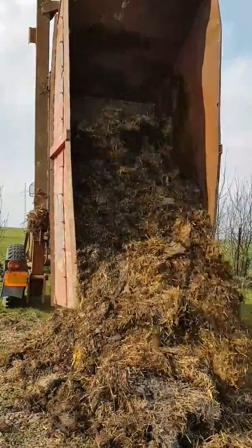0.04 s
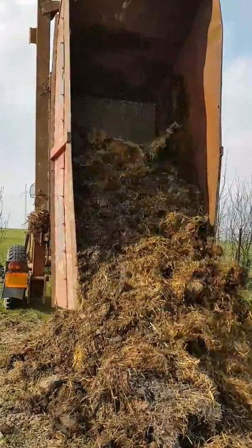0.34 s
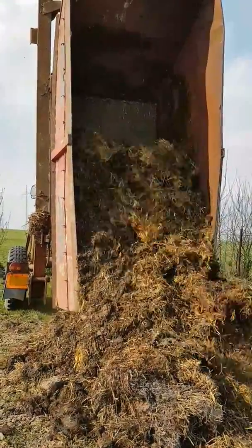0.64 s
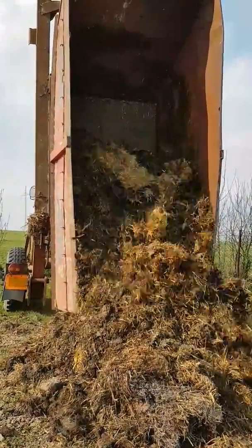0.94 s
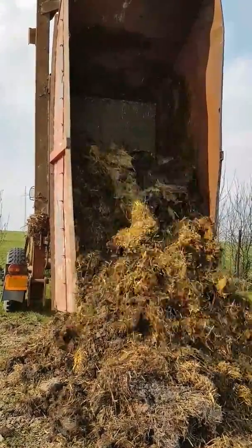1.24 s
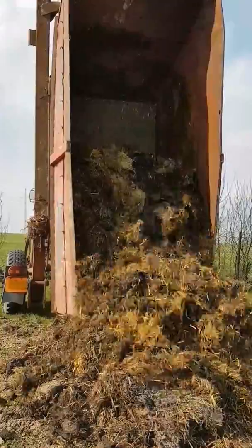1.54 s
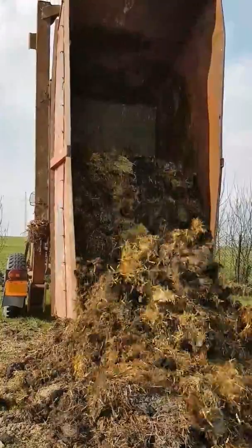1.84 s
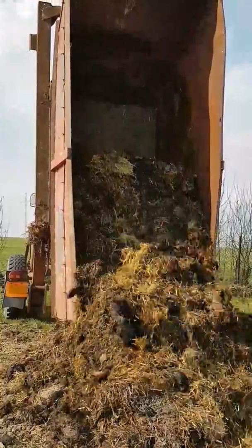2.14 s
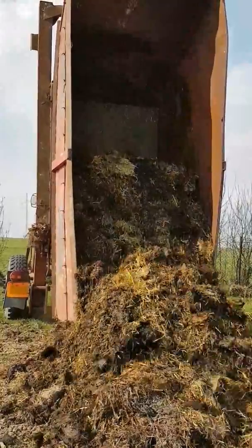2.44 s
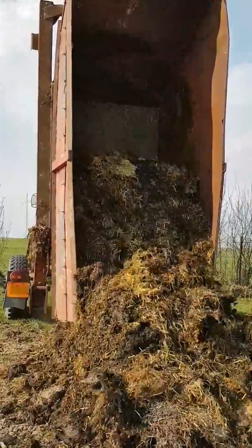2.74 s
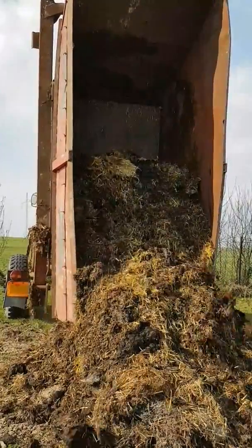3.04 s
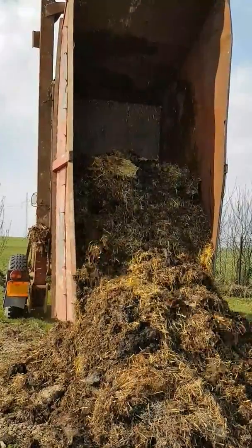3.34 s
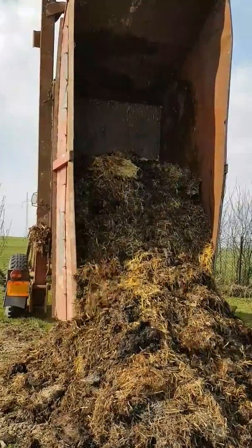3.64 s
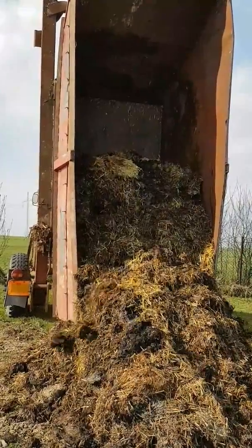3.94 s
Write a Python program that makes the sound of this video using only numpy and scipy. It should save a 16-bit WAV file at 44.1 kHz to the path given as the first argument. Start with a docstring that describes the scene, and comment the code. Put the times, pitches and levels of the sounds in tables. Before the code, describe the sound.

A tractor's diesel engine rumbles slightly to the right, slowing to idle over the first second and running throughout. Straw and muck rustle faintly off the trailer, thinning after 2 seconds. A loose fitting gives small squeaks, clearest in the first half second. At about 2.5 seconds the steel trailer jolts with a loud, rapid cluster of clanks and a hollow boom that fades by around 3.3 seconds.

```python
"""A tractor's four-cylinder diesel drops to idle in an open field, a little right of the microphones,
each firing puffing the exhaust and knocking the block. Straw and muck slide off its raised tipping
trailer with a soft rustle while a loose fitting squeaks. The engine labours, then the steel body jolts:
a quick run of clanks, and a boom that dies away in the hollow container."""
import sys
import numpy as np
from scipy import signal
from scipy.fft import rfft, irfft
from scipy.io import wavfile

SR = 44100
rng = np.random.default_rng(int(sys.argv[2]) if len(sys.argv) > 2 else 0)


def master_out(mix):
    """Clip the mix to full scale and print it as 16-bit PCM to the path in sys.argv[1]."""
    frames = np.transpose(np.atleast_2d(mix))
    ceiling = np.clip(frames, -1, 1)
    pcm = np.round(ceiling * 32767).astype(np.int16)
    wavfile.write(sys.argv[1], SR, pcm)


N = 176400

# Engine speed. Each row: time in seconds, firings per second.
FIRING_RATE = [(0, 54.3), (.22, 52.9), (.55, 46.87), (.9, 43.06), (1.7, 41.43), (2, 40.28), (2.47, 37.12),
               (2.7, 37.8), (3.13, 39.72), (3.6, 39.3), (4, 39.36)]
# The exhaust's first three harmonics. Each row: time in seconds, level in dB.
FIRST_HARMONIC = [(0, -38), (.25, -33.5), (.4, -37.5), (.54, -31), (.66, -35), (.75, -27), (.89, -27),
                  (.99, -46), (2, -47), (2.45, -41), (2.9, -39), (3.15, -55), (3.6, -47)]
SECOND_HARMONIC = [(0, -42), (.27, -32.5), (.6, -41), (.9, -32), (1.05, -39), (1.6, -37.5), (2, -32.5),
                   (2.35, -30), (2.8, -31.5), (3.4, -37.5), (3.749, -33)]
THIRD_HARMONIC = [(0, -43), (2, -42), (2.3, -39.5), (3.3, -44.5), (3.9, -36.5)]
# How hard the engine works. Each row: time in seconds, rumble in dB, clatter in dB.
ENGINE_EFFORT = [(0, -32.5, -36.5), (.3, -29.5, -38.5), (.7, -37, -41), (1.3, -36.5, -40.5),
                 (1.9, -38, -43), (2.4, -39, -44), (2.9, -33.5, -39), (3.3, -38, -43.5),
                 (3.7, -35.5, -41.5), (4, -36.5, -41)]
# Exhaust rumble and diesel clatter. Each row: frequency in Hz, relative level in dB.
RUMBLE_SPECTRUM = [(20, -32), (60, -2.5), (115, -2.5), (145, -9.5), (185, -2.5), (212, -13.5), (245, -5),
                   (300, -15.5), (400, -21), (3000, -64)]
CLATTER_SPECTRUM = [(30, -45), (250, 4.5), (450, -3), (600, 0), (1000, -4), (1400, 0), (1800, -3),
                    (2400, -3.5), (3300, -11), (4200, -15.5), (5200, -26), (8000, -26.5), (16000, -48.5)]
# Resonances of exhaust pipe and engine block. Each row: centre in Hz, width in Hz, lift in dB.
PIPE_PEAKS = [(108.55, 4.3, 13), (186, 12, 1), (254.6, 19.3, 5.5)]
BLOCK_PEAKS = [(609, 6.6, 8.5), (801, 96, 7.5), (915, 18, 7), (1223, 21, 7.5)]
# The tractor at the microphones. Each row: frequency in Hz, left minus right in dB.
ENGINE_BALANCE = [(60, -0.2), (300, -5), (600, -0.5), (900, -4), (1400, -5.5), (2400, -11), (3300, -8.5),
                  (4500, -2.5), (9000, -3)]


def diesel_engine(knock_share=.29, knock_firings=.4, roughness=.55):
    """Off to the right, each firing pushes the exhaust and knocks the block; no two are alike."""
    firings = np.cumsum(curve(FIRING_RATE) * (1 + .00565 * wander(hz=9.1))) / SR
    hum = 0
    for k, level in enumerate([FIRST_HARMONIC, SECOND_HARMONIC, THIRD_HARMONIC], 1):
        gain = amp(curve(level) + .89 * wander(hz=25.5))
        hum += gain * np.sqrt(2) * np.sin(2 * np.pi * (k * firings + rng.random()))
    force = amp(.5 * rng.standard_normal(N)[firings.astype(int)])
    pulses = force * (1 - knock_share + 2 * knock_share * np.exp(-(firings % 1) / knock_firings))
    gas = (1 - roughness) * exhaust_puffs(firings) + roughness * unit(pulses * noise(N))
    rumble = colour(gas, RUMBLE_SPECTRUM, ENGINE_BALANCE, PIPE_PEAKS)
    clatter = colour(pulses * noise(N), CLATTER_SPECTRUM, ENGINE_BALANCE, BLOCK_PEAKS, ripple_db=1.8)
    rumble *= amp(curve(ENGINE_EFFORT))
    clatter *= amp(curve(ENGINE_EFFORT, column=2))
    return hum * pan(-1.8) + rumble + clatter


def exhaust_puffs(firings, cylinders=4, uneven_db=-5, drift_hz=5):
    """Drifting exhaust tones; unequal cylinders fill the gaps between the firing harmonics."""
    out = 0
    for k in range(3, 40):
        between = k % cylinders > 0
        if between or k > 3 * cylinders:  # the hum carries the first three harmonics
            phase = 2 * np.pi * k / cylinders * firings
            tone = wander(drift_hz) * np.cos(phase) + wander(drift_hz) * np.sin(phase)
            out += amp(uneven_db * between) * tone
    return unit(out)


# Blows on the trailer body. Each row: start and rise in seconds; clang, ring, crack and boom in dB;
# clang length factor; favoured band in Hz, its lift in dB.
BODY_BLOWS = [(2.485, 0.00062, -13.5, -14.5, -33.5, -45, 0.78, 720, 1),
              (2.555, 0.003, -17, -24, -36, -26, 1.04, 1170, 11.5),
              (2.568, 0.0045, -17.5, -34, -40, -20, 0.49, 590, 14.5),
              (2.5955, 0.00086, -16, -20.5, -19.5, -23, 1.06, 2200, -2),
              (2.614, 0.002, -18, -48, -45, -29.5, 0.57, 1960, 5),
              (2.657, 0.0056, -41, -36, -64, -30.5, 3.2, 600, -8)]


def container(echo_db=-20.5, echo_t60=.96):
    """The run of blows and their faint echo inside the open steel body."""
    out = np.zeros((2, N))
    for start, *settings in BODY_BLOWS:
        add(out, start, steel_blow(*settings))
    tail = unit(noise(SR) * amp(-60 * np.arange(SR) / SR / echo_t60)) / np.sqrt(SR)
    return out + amp(echo_db) * signal.fftconvolve(out, tail, axes=1)[:, :N]


# Panel clang, contact crack and hollow boom. Each row: frequency in Hz, relative level in dB.
CLANG_SPECTRUM = [(40, -30), (200, 0), (400, -4.5), (750, -1.5), (1050, -1.5), (1500, -3), (2100, -2.5),
                  (2800, -7), (3500, -13.5), (4200, -17), (5200, -32), (7400, -23.5), (9500, -41),
                  (16000, -49)]
CRACK_SPECTRUM = [(2000, -31), (4200, 12.5), (5300, -9), (7400, -1), (9000, -11.5), (16000, -16)]
BOOM_SPECTRUM = [(15, -27), (35, 6), (65, -4.5), (95, -13), (125, 4), (175, 1.5), (235, 1.5), (320, -6),
                 (420, -10.5), (650, -10.5), (1200, -37), (5000, -69)]
# Damping. Each row: frequency in Hz, seconds to fall 60 dB (for the clang, before its length factor).
CLANG_DECAY = [(100, 1), (500, 0.61), (900, 0.3), (2200, 0.3), (5000, 0.21), (15000, 0.2)]
BOOM_DECAY = [(40, 0.42), (120, 1.57), (200, 1.16), (400, 0.96), (2000, 0.84)]
# Modes of the steel panels. Each row: frequency in Hz, relative level in dB, seconds to fall 60 dB.
PANEL_MODES = [(500, -14, .6), (782, 0, .33), (974, 2, .22), (1044, -7, .27), (1102, -8, .35),
               (1160, -8, .35), (1288, -8, .3), (1624, -7, .3), (1816, -6, .3), (2174, 1, .25),
               (2592, -9, .22), (4150, -2, .18), (7300, 2, .05)]
# The steel body at the microphones. Each row: frequency in Hz, left minus right in dB.
STEEL_BALANCE = [(60, -3.5), (250, -1.5), (500, 2), (1000, -5.5), (2000, -6), (4500, -5), (9000, 0)]


def steel_blow(rise_s, clang_db, ring_db, crack_db, boom_db, length, band_hz, lift_db):
    """Steel hits steel: a crack, the clang and ring of the panels, then the body's boom."""
    crack_t60, ring_rise_s, boom_rise_s = .15, .012, .0064
    t = np.arange(SR) / SR
    decay = [(hz, t60 * length) for hz, t60 in CLANG_DECAY]
    clang = steel_modes(CLANG_SPECTRUM, decay, peaks=[(band_hz, .49 * band_hz, lift_db)])
    crack = colour(noise(SR), CRACK_SPECTRUM, STEEL_BALANCE) * amp(-60 * t / crack_t60)
    ring = 0
    for hz, db, t60 in PANEL_MODES:
        level = db - 8 * abs(np.log2(hz / band_hz))  # 8 dB less per octave from the favoured band
        phase = 2 * np.pi * (hz * t + rng.random()) + np.pi / 2 * rng.uniform(-1, 1, (2, 1))
        ring += amp(level - 60 * t / t60) * pan(at_hz(STEEL_BALANCE, hz)) * np.sin(phase)
    ring *= np.minimum(t / ring_rise_s, 1) ** 2
    boom = steel_modes(BOOM_SPECTRUM, BOOM_DECAY) * (1 - np.exp(-t / boom_rise_s))
    blow = amp(clang_db) * clang + amp(ring_db) * ring + amp(crack_db) * crack + amp(boom_db) * boom
    return np.minimum(t / rise_s, 1) * blow


def steel_modes(spectrum, decay, peaks=()):
    """A dense cloud of steel modes, each band dying at its own speed."""
    cloud = np.tile(colour(noise(SR), spectrum, STEEL_BALANCE, peaks, ripple_db=1.8), 2)
    hz, t, bands = signal.stft(cloud, SR, nperseg=512)
    fade = amp(-60 * np.maximum(t - .5, 0) / at_hz(decay, hz)[:, None])
    _, faded = signal.istft(bands * fade, SR, nperseg=512)
    return faded[:, SR // 2:][:, :SR]  # one second from the start of the fade


# Heavy bumps. Each row: start in seconds, length in seconds, pitch in Hz, level in dB.
CHASSIS_BUMPS = [(2.506, 0.078, 69.2, -16), (2.563, 0.021, 140, -14), (2.645, 0.062, 48.6, -16),
                 (2.652, 0.013, 167, -20)]
# A thin scraping squeal. Each row: time in seconds, level in dB.
SQUEAL_LEVEL = [(0, -53.5), (.4, -48), (.7, -110)]


def chassis(squeal_hz=3125, squeal_width_hz=72):
    """Deep bumps as the trailer rocks, and a faint scrape."""
    out, t = np.zeros((2, N)), np.arange(N) / SR
    for start, length, hz, db in CHASSIS_BUMPS:
        swell = np.hanning(int(length * SR))
        add(out, start, amp(db) * pan(-1.8) * swell * np.sin(2 * np.pi * hz * t[:len(swell)]))
    flutter = np.array([wander(squeal_width_hz) for _ in range(2)])
    return out + amp(curve(SQUEAL_LEVEL)) * flutter * np.sin(2 * np.pi * squeal_hz * t)


# The sliding load. Each row: time in seconds, level in dB.
SLIDE_LEVEL = [(0, -52), (.45, -54.5), (.77, -53), (.79, -48.5), (1.05, -51.5), (1.2, -47.5), (1.35, -51),
               (1.7, -51), (2.3, -55), (3.2, -60), (4, -64.5)]
# Clumps that slip. Each row: start in seconds, length in seconds, level in dB.
CLUMP_SLIPS = [(0.043, 0.063, -50.5), (0.288, 0.13, -51.5), (0.977, 0.043, -49.5), (1.159, 0.074, -41.5),
               (2.405, 0.032, -45.5)]
# Rustle of loose straw and of clumps. Each row: frequency in Hz, relative level in dB.
STRAW_SPECTRUM = [(200, -59), (2000, -7), (4000, -2.5), (5300, -6), (7800, -2), (9500, -8.5), (12000, -6),
                  (16000, -9)]
CLUMP_SPECTRUM = [(300, -5), (3000, 2.5), (4200, 1), (5500, -4), (7200, 6), (9000, -10), (16000, -56)]
# The load at the microphones. Each row: frequency in Hz, left minus right in dB.
STRAW_BALANCE = [(2000, 0.5), (7500, -0.5), (10500, 3.5)]


def straw(snaps_per_s=990, snap_share=.37):
    """Near the centre, rubbing stalks hiss with tiny snaps; now and then a clump slips."""
    snaps = noise(N) * (rng.random((2, N)) < snaps_per_s / SR)
    rubbing = snap_share * unit(snaps) + (1 - snap_share) * noise(N)
    out = colour(rubbing, STRAW_SPECTRUM, STRAW_BALANCE) * amp(curve(SLIDE_LEVEL))
    for start, length, db in CLUMP_SLIPS:
        swell = np.hanning(int(length * SR)) ** .5
        rustle = colour(noise(SR), CLUMP_SPECTRUM, STRAW_BALANCE)
        add(out, start, amp(db) * swell * rustle[:, :len(swell)])
    return out


# The fitting's louder squeaks. Each row: start in seconds, level in dB.
LOUD_SQUEAKS = [(0, -42), (.293, -40), (.452, -38.5), (1.468, -46), (1.92, -46), (3.025, -45), (3.9, -46)]


def loose_fitting(pitch_hz=1213, length_s=.052, faint_per_s=7, faint_db=-51.5):
    """On the right, a steel fitting rubs as the trailer shakes: short squeaks of varying pitch."""
    out, t = np.zeros((2, N)), np.arange(0, length_s, 1 / SR)
    faint = [(slot + rng.random() / faint_per_s, faint_db + 2 * rng.standard_normal())
             for slot in np.arange(0, N / SR, 1 / faint_per_s)]
    for start, db in LOUD_SQUEAKS + faint:
        hz = pitch_hz * (1 + .01 * rng.uniform(-1.6, 1))
        add(out, start, amp(db) * pan(-7) * np.hanning(len(t)) * np.sin(2 * np.pi * hz * t))
    return out


# How alike the two microphones hear the field. Each row: frequency in Hz, likeness (capped at 1).
MIC_LIKENESS = [(150, 2), (300, 0.65), (550, 0.98), (1000, 0.5), (2000, 1.16), (4000, 0.08), (12000, 0)]


def colour(pair, spectrum, balance, peaks=(), ripple_db=0):
    """Gives two signals a spectrum, resonances, a ripple of lesser modes and a stereo place, at rms 1."""
    size = pair.shape[1]
    hz, (a, b) = np.fft.rfftfreq(size, 1 / SR), rfft(pair)
    likeness = np.clip(at_hz(MIC_LIKENESS, hz), -1, 1)
    mid, side = a * np.sqrt(1 + likeness), b * np.sqrt(1 - likeness)
    stereo = np.array([mid + side, mid - side]) * pan(at_hz(balance, hz))
    db = at_hz(spectrum, hz)
    db += sum(lift / (1 + (2 * (hz - centre) / width) ** 2) for centre, width, lift in peaks)
    ripple_hz = np.arange(1250, SR / 2, 22)
    db += ripple_db * np.interp(hz, ripple_hz, rng.standard_normal(len(ripple_hz)), left=0)
    return unit(irfft(stereo * amp(db), size))


def amp(db):
    """Decibels to gain."""
    return 10 ** (np.asarray(db) / 20)


def pan(db):
    """Gains at the two microphones for a left-minus-right level in dB."""
    return amp(np.array([[.5], [-.5]]) * db)


def unit(x):
    """Scales to rms 1."""
    return x / np.sqrt(np.mean(x ** 2) + 1e-20)


def noise(size):
    """Two unrelated channels of white noise."""
    return rng.standard_normal((2, size))


def wander(hz):
    """Random drift of rms 1, mostly slower than hz."""
    lowpass = np.exp(-(np.fft.rfftfreq(N, 1 / SR) / hz) ** 2)
    return unit(irfft(rfft(rng.standard_normal(N)) * lowpass, N))


def at_hz(points, hz):
    """Reads a table on a log-frequency axis."""
    f, value = np.transpose(points)
    return np.interp(np.log(hz + 1), np.log(f + 1), value)


def curve(points, column=1):
    """Reads one column of a time table at every sample."""
    columns = np.transpose(points)
    return np.interp(np.arange(N) / SR, columns[0], columns[column])


def add(mix, start_s, sound):
    """Mixes a stereo sound in at start_s."""
    part = mix[:, round(start_s * SR):][:, :sound.shape[1]]
    part += sound[:, :part.shape[1]]


def scene():
    """Tractor, sliding load and trailer together in the open field."""
    return diesel_engine() + straw() + container() + chassis() + loose_fitting()


def record(dry):
    """A microphone pair: sound reaches the right one a little later, and the top treble is cut."""
    lag_samples, cutoff_hz = 3, 15780
    pair = np.array([dry[0], np.pad(dry[1], (lag_samples, 0))[:N]])
    lowpass = signal.firwin(511, cutoff_hz, window=("kaiser", 9), fs=SR)
    return signal.oaconvolve(pair, lowpass[None], "same")


dry = scene()
out = record(dry)
master_out(out)
```